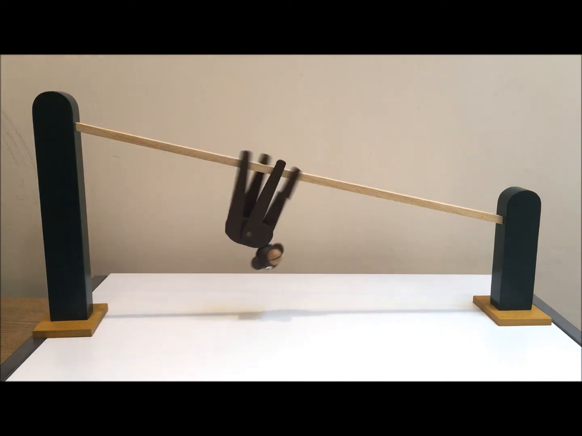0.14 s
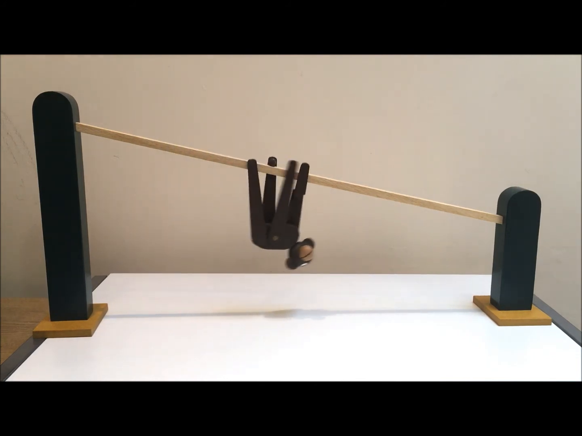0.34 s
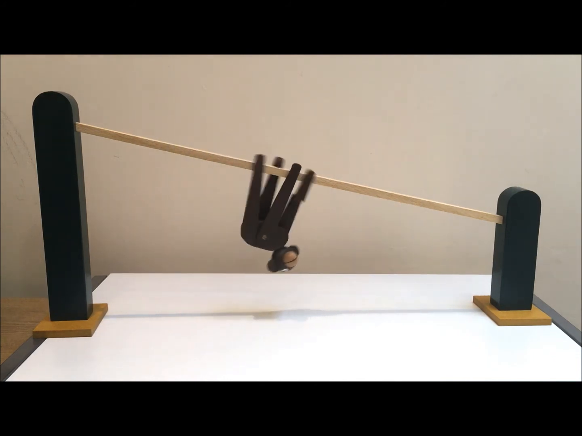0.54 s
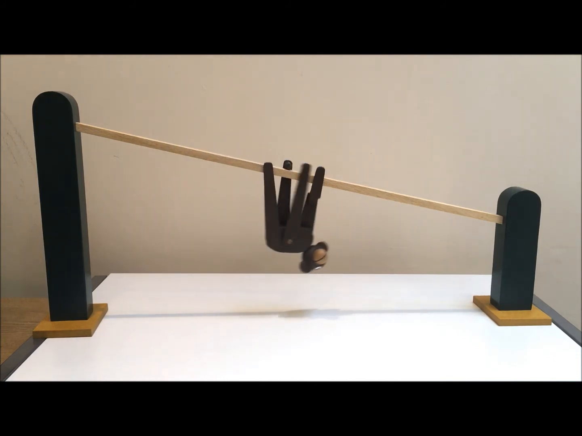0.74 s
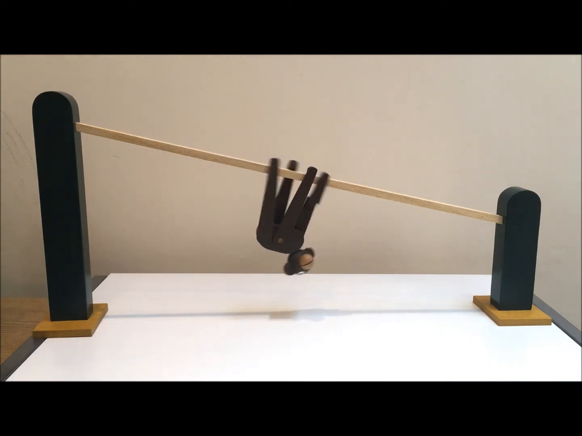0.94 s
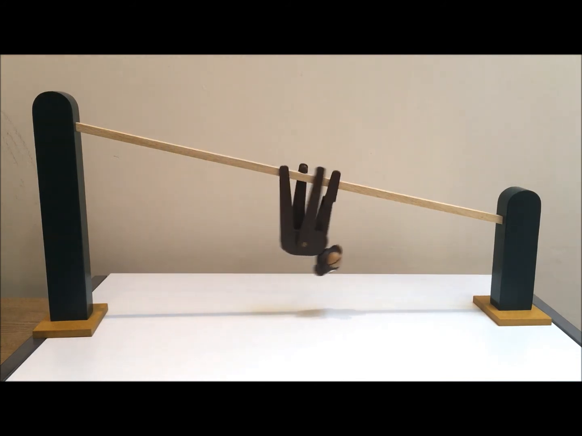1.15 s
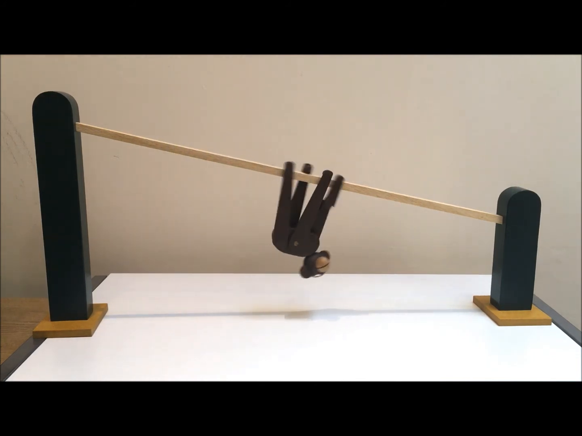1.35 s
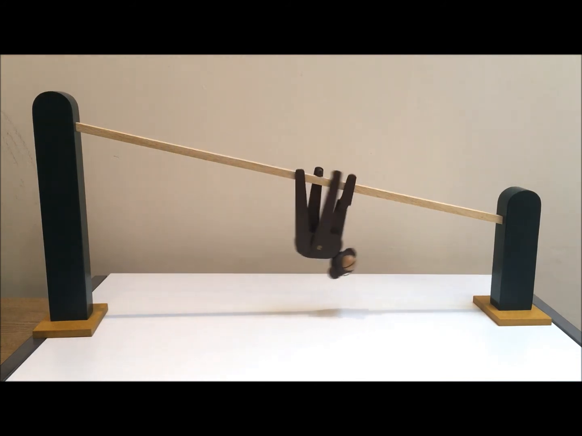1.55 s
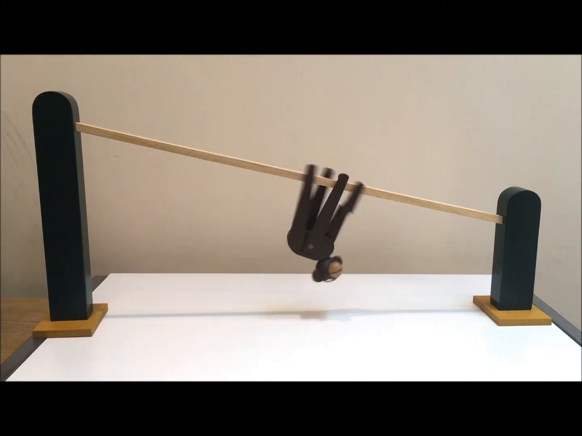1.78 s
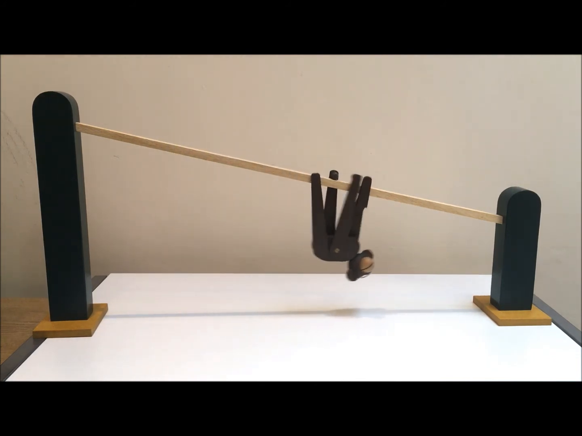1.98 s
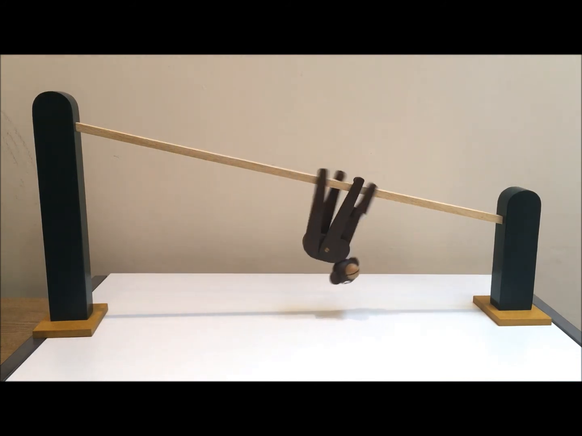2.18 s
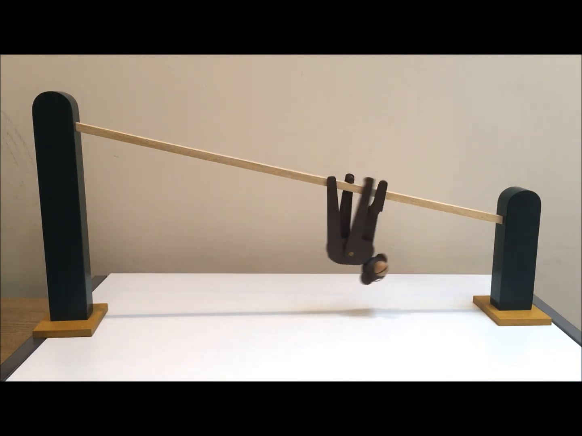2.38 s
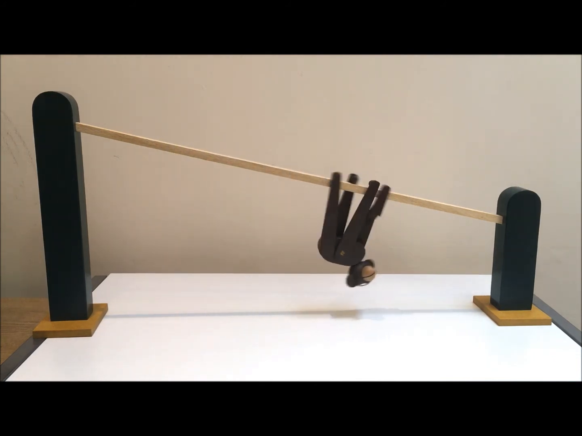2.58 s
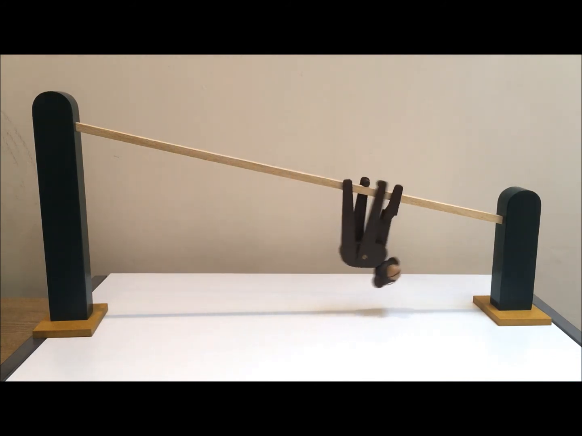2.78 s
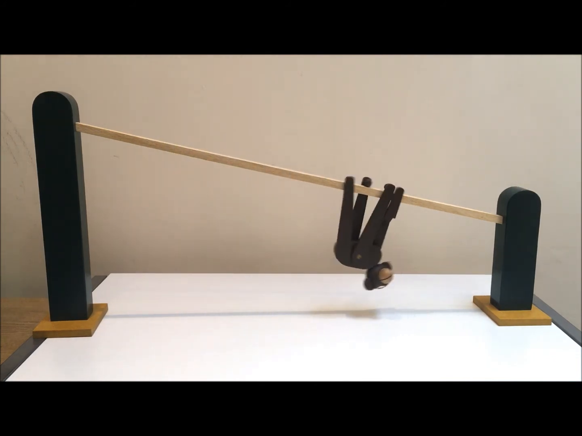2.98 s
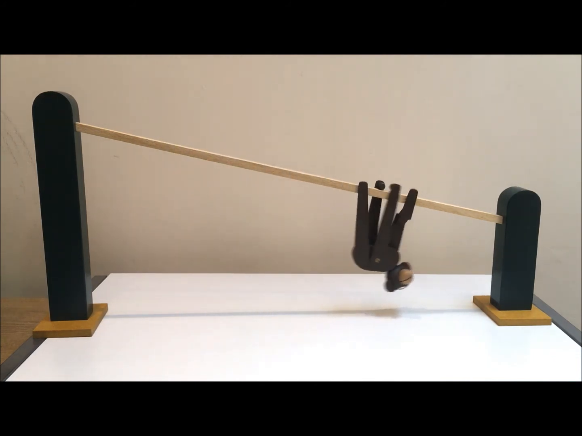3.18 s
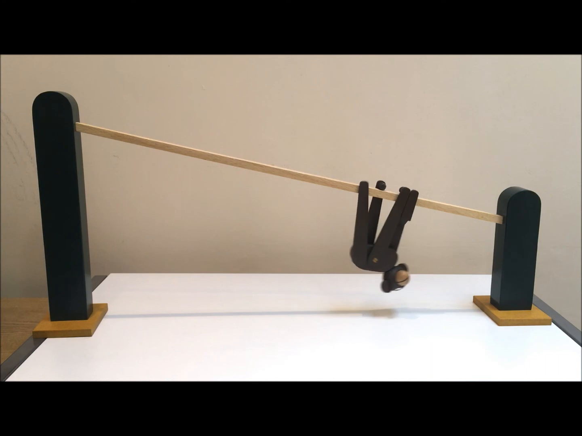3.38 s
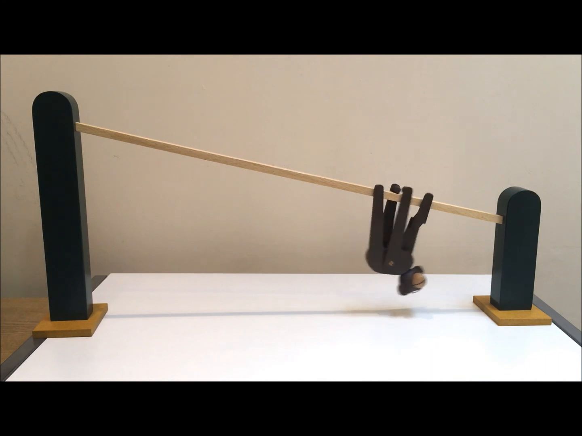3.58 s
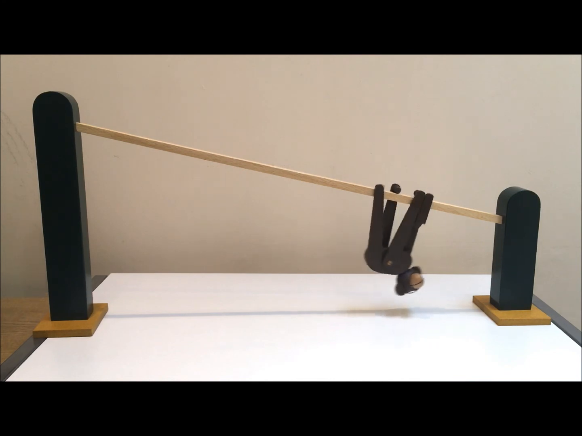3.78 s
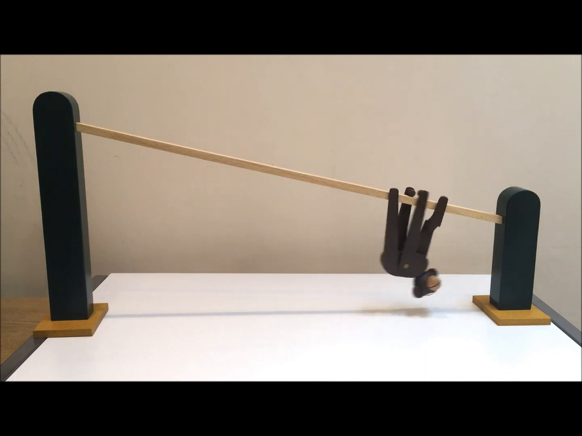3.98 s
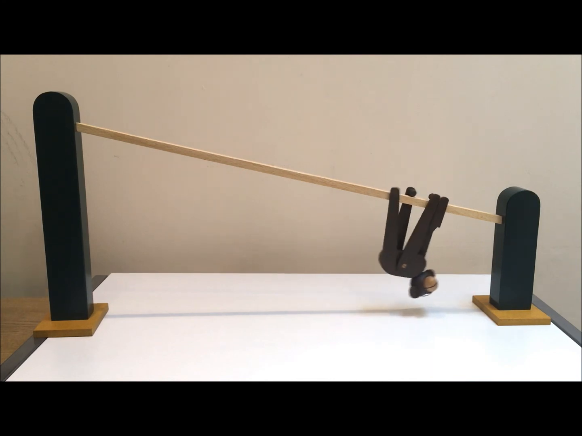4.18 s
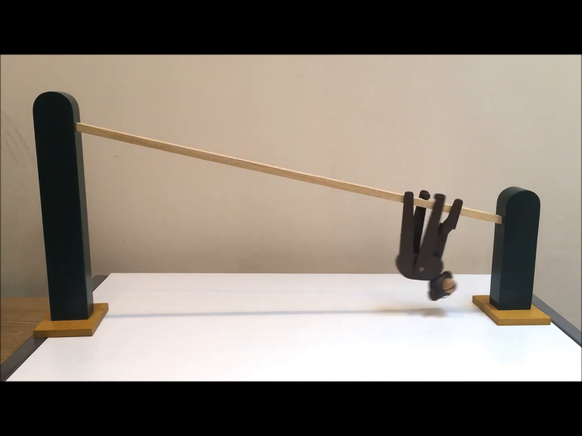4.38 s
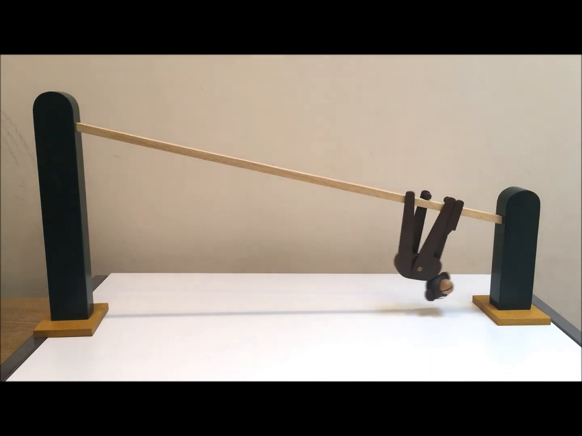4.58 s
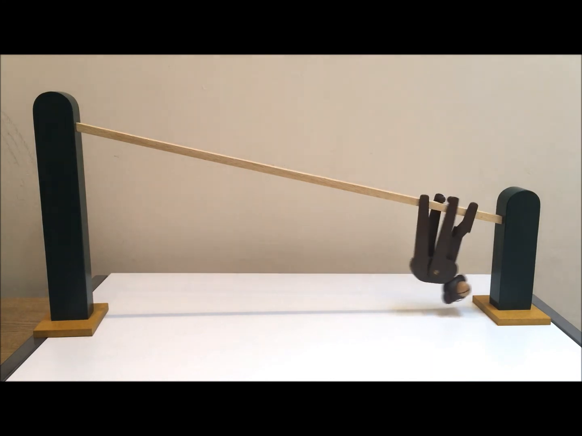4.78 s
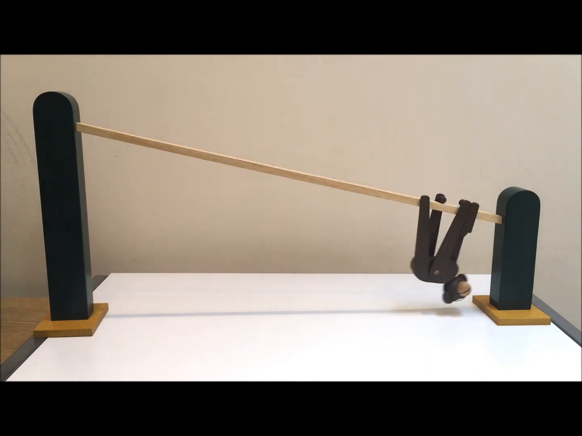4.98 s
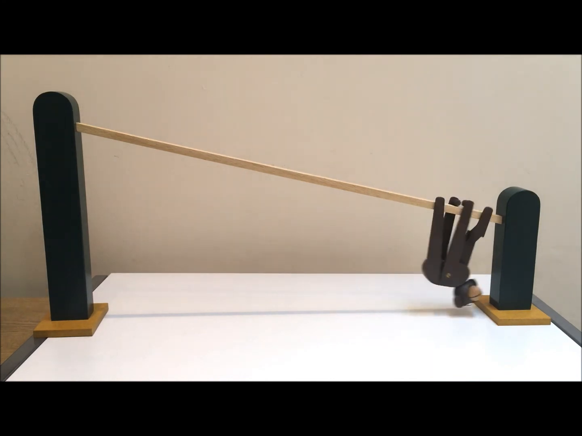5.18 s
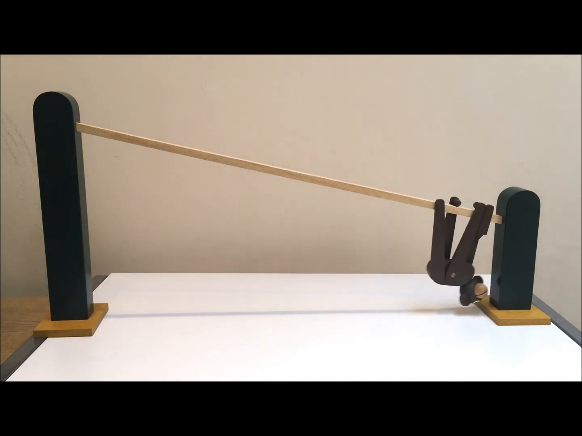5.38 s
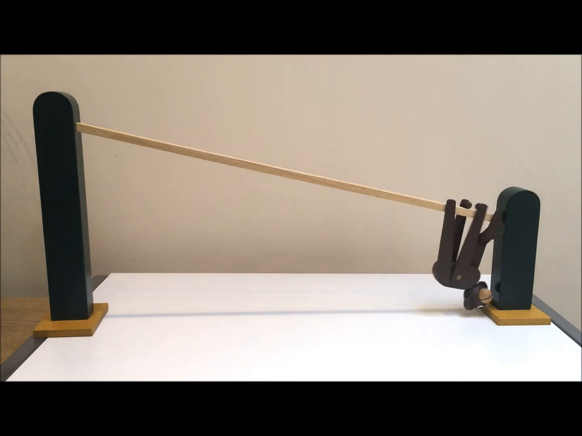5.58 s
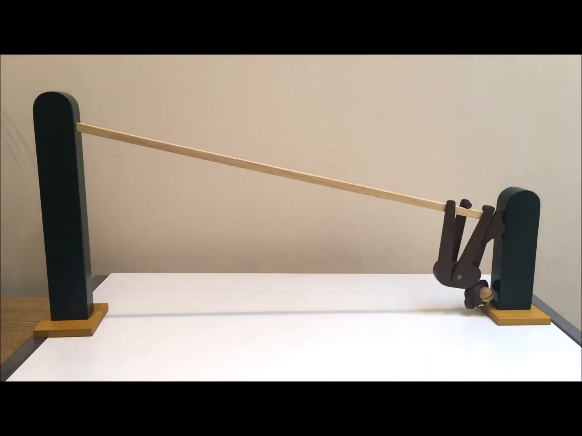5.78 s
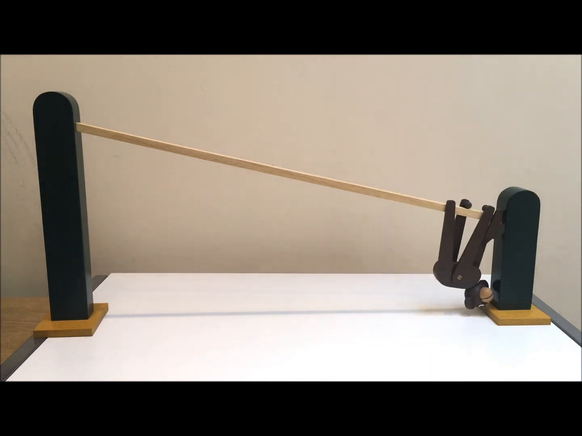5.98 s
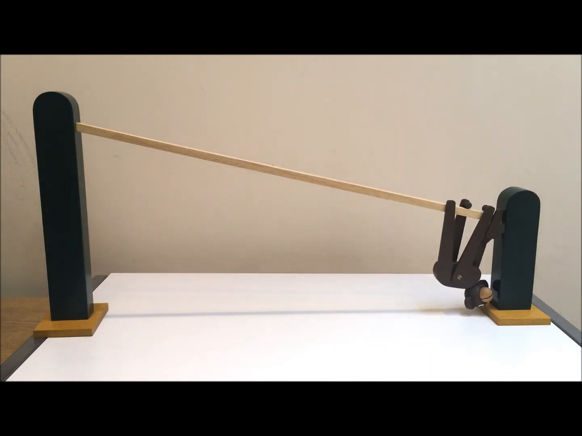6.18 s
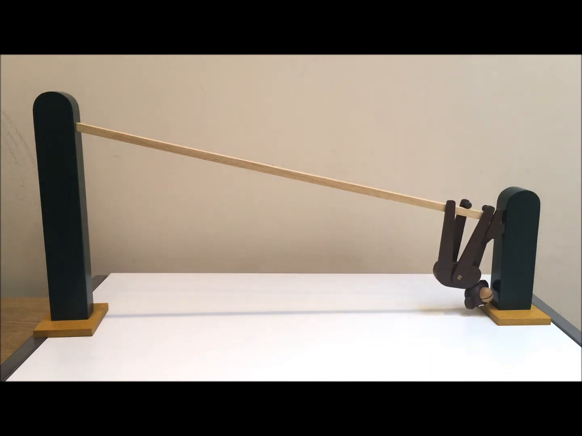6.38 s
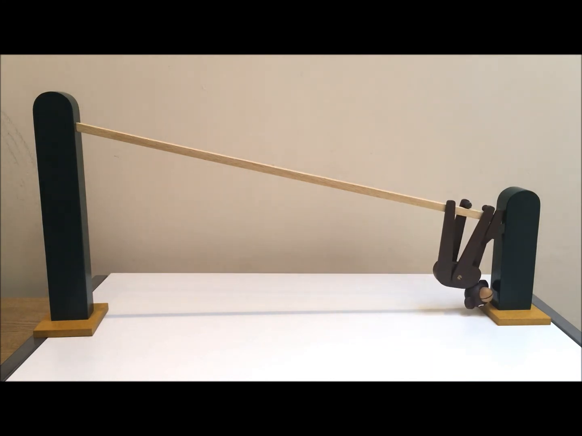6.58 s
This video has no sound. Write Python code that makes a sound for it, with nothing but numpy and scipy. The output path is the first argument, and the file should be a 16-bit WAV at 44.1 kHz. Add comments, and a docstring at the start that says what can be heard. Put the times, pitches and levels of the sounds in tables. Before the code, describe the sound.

Close by in a small, quiet room, a toy's wooden limbs click against a rod in a quick, steady tick-tock, gripping, briefly scraping and catching again. The clicks soften slightly while low thuds and a faint hum from the table grow. After about five and a half seconds the toy thumps into a wooden post, rattles lightly and settles, leaving faint room hiss.

```python
"""A toy figure rocks down a sloping wooden rod, clacking over a faint hum.
Each swing has a bright clack as its limbs grip, a short scraping, rattling slide, and a click as they
catch the rod again. The rod's stand, on a table in a small, dry room, thumps and hums more as the
figure nears the lower post. There the figure bumps and comes to rest."""
import sys
import numpy as np
from scipy import signal
from scipy.fft import rfft, irfft, next_fast_len
from scipy.io import wavfile

SR = 44100
rng = np.random.default_rng(int(sys.argv[2]) if len(sys.argv) > 2 else 0)


def master(y):
    """Save y as 16-bit WAV."""
    cut = np.clip(np.atleast_2d(y).T, -1, 1)
    pcm = np.round(cut * 32767)  # scale
    wavfile.write(sys.argv[1], SR, pcm.astype(np.int16))


N = 293265

# the limbs grip on the back swing: t/s, relative snap level/dB
GRIP_HITS = [(0.0005, -33), (0.4151, -21), (0.8247, -20.5), (1.2317, -19), (1.6276, -20), (2.0436, -19.5),
             (2.4571, -21.5), (2.8696, -22.5), (3.2849, -26), (3.7089, -23.5), (4.1005, -25), (4.492, -25),
             (4.9117, -26.5), (5.3094, -26.5)]
# the loose limbs bounce back: t/s, relative level/dB
LIMB_TICKS = [(0.051, -39.5), (1.5295, -53), (3.329, -47), (4.538, -40), (5.160, -40.5), (5.352, -51)]
# the limbs catch the rod after a slide: t/s, relative snap level/dB
CATCH_HITS = [(0.2248, -22), (0.6313, -23), (1.0373, -21), (1.4424, -20.5), (1.8551, -24), (2.2682, -22.5),
              (2.6788, -20), (3.0924, -26.5), (3.5064, -22.5), (3.9041, -20.5), (4.3023, -21.5),
              (4.7081, -21.5), (5.124, -28)]
# the body knocks against rod and post: t/s, relative level/dB
BODY_BUMPS = [(0.582, -50), (1.812, -51), (2.905, -45.5), (3.051, -45.5), (3.438, -52.5), (5.071, -49),
              (5.542, -39), (5.581, -42.5), (5.602, -58), (5.681, -54), (5.739, -59)]
# the limbs rub near the low end: t/s, length/s, level/dB
LIMB_RUBS = [(3.198,0.07,-63.5),(4.402,0.11,-64),(4.822,0.083,-65),(5.198,0.1,-65)]

# A mode is a pitch at which a thing rings; the wider it is, the sooner it fades.
# the wood in a grip, a catch and a body knock: f/Hz, width/Hz, relative level/dB, pitch rise/(share per s)
GRIP_WOOD_MODES = [(1913, 200, -4.5, 0.018), (3083, 70, -0.5, 0.008), (4050, 55, -7.5, 0.000036),
                   (4530, 280, -0.5, 0), (5000, 140, -19.5, 0), (6098, 190, 10, 0.0019),
                   (7280, 320, -1, 0.0028), (8700, 780, 10.5, 0.0015), (9436, 240, 10.5, 0.00088),
                   (10710, 450, 14, 0.000039), (12300, 540, 11, 0.00036), (13180, 450, 6.5, 0),
                   (14430, 780, 12.5, 0.0074), (15260, 530, 13, 0.00085)]
CATCH_WOOD_MODES = [(1812, 193, -4.5, 0.0099), (2335, 47, -3, 0.00058), (3223, 181, -17.5, 0.0025),
                    (3975, 470, -3.2, 0.0016), (4570, 550, 0.2, 0.001), (5480, 340, 3, 0.008),
                    (6180, 216, 5.5, 0.0035), (7100, 1200, 1.65, 0.02), (9000, 560, -0.3, 0.0028),
                    (11140, 490, 7.5, 0.00094), (11420, 860, 4, 0.024), (13250, 540, 13, 0.0087),
                    (15400, 610, -12.5, 0.0098)]
BODY_WOOD_MODES = [(1040,320,6,0.018),(1250,180,7.5,0.0065),(1560,540,4.5,0.0056),(1766,340,4.5,0.014),(2370,220,1.5,0.0025),(3050,230,2,0.012),(4400,980,-4.5,0.055)]
# the rod's longer rings: f/Hz, width/Hz, relative level/dB
ROD_RING_MODES = [(3280,45,-9.5),(6200,42,8.5),(10100,110,9)]
# six deep modes of the table, then the hollow ones of the posts: f/Hz, width/Hz, relative level/dB
TABLE_AND_POST_MODES = [(114.4,14,-6),(154.2,18.5,4.5),(182,16,1),(237,28,-3.5),(259.6,12,-2.5),(310.1,9.3,1.5),(509,20,-0.5),(564,9.4,2.5),(617,23,1.5),(681,8.6,7.5),(842,140,-6),(945,84.8,-3.5),(1067,37,0),(1257,30,0),(1520,170,-24)]
# the table trembles and the whole stand sways: f/Hz, width/Hz, relative level/dB
TABLE_HUM_MODES = [(112.8,8,5.5),(150.2,23.6,-4),(185.3,27,-3.5),(245,43,-19),(311.5,15,-13.5),(672,32,-19.5)]
STAND_SWAY_MODES = [(47,18,-4),(71,10.4,2.5),(95,15,-10.5)]
# the top edge of the table's thud, deeper near the lower post: t/s, f/Hz
THUD_CUTOFF = [(0,433),(2.2,515),(4.0,237),(4.8,182),(5.6,194)]

# the tone of the quiet room and of wood sliding on wood: f/Hz, relative level/dB
HISS_SPECTRUM = [(15,-43),(28,-27),(50,-5.5),(65,-12),(80,-14.5),(140,-25),(220,-20),(400,-26),(1480,-35),(3500,-36),(5000,-39),(12900,-34),(15600,-31),(16200,-52.5)]
SCRAPE_SPECTRUM = [(400,-8),(700,0.5),(1250,-4.5),(1800,-12.5),(2500,-13),(3200,-17.5),(3800,-22),(5800,-17.5),(9000,-21.5),(12000,-19),(16000,-38)]
# how fast the room's echo fades: f/Hz, time to fall 60 dB/s
ECHO_FADE = [(150,2.5),(700,0.18),(2500,0.1852),(6000,0.1461),(14000,0.143)]
# the room's echo against the direct sound: f/Hz, level/dB
ECHO_LEVEL = [(150,28),(700,-4),(2500,-1.5),(6000,-7),(10000,-4),(15000,-14)]
# single echoes from the walls: delay/s, level/dB
WALL_ECHOES = [(0.015,-23),(0.0164,-17.5),(0.035,-26),(.0462,-34)]

SLIDE_S, POST_HIT_S = .0685, 5.5397   # length of each slide; when the figure meets the post
SLIDE_ENDS = [s for s, _ in CATCH_HITS] + [POST_HIT_S]
TABLE_MODES, POST_MODES = TABLE_AND_POST_MODES[:6], TABLE_AND_POST_MODES[6:]
TAIL = np.arange(SR // 4) / SR   # time within one short sound, in seconds


def from_db(db):
    """Turn decibels into a gain."""
    return 10 ** (np.asarray(db) / 20)


def rms_one(x):
    """Scale to an average (rms) level of 1."""
    return x / np.sqrt(np.mean(x ** 2) + 1e-20)


def unit_hit(x):
    """Scale a hit to the energy of 4 ms at rms 1."""
    return x / np.sqrt(np.sum(x ** 2) / (.004 * SR) + 1e-20)


def at_hz(points, hz):
    """Read between a table's rows on a log-frequency axis."""
    points = np.array(points)
    return np.interp(np.log(np.maximum(hz, 1)), np.log(points[:, 0]), points[:, 1])


def coloured(x, spectrum):
    """Give a noise the tone of a spectrum, at rms 1."""
    size = next_fast_len(len(x) + len(TAIL))
    gains = from_db(at_hz(spectrum, np.fft.rfftfreq(size, 1 / SR)))
    return rms_one(irfft(rfft(x, size) * gains, size)[:len(x)])


def keep_band(x, hz, kind):
    """Let the "low" side, the "high" side or a "band" through."""
    return signal.sosfilt(signal.butter(2, hz, kind, fs=SR, output="sos"), x)


def add(out, s, x):
    """Mix x into out at time s."""
    i = max(round(s * SR), 0)
    out[i:i + len(x)] += x[:N - i]


def resonance(x, hz, width):
    """Let x ring at one pitch, with gain 1 at the peak."""
    r = np.exp(-np.pi * width / SR)
    feedback = [1, -2 * r * np.cos(2 * np.pi * hz / SR), r * r]
    return signal.lfilter(np.array([1, 0, -1]) * (1 - r * r) / 2, feedback, x + 1e-18)


def ringing(modes, force, spread_db, detune, s=0):
    """Each mode takes its share of a blow, a little differently every time."""
    out = 0
    for k, (hz, width, db, *rise) in enumerate(modes):
        pitch = hz * (1 + sum(rise) * s + detune * rng.standard_normal())
        gain = np.sqrt(width) * from_db(db + spread_db * rng.standard_normal())
        out = out + (-1) ** k * gain * unit_hit(resonance(force, pitch, width))
    return out


def strike(modes, s, chatter, chatter_s, crack_db=-8.0, crack_hz=2200):
    """A hard contact and its tiny bounces (chatter) give a crack and ring the wood."""
    force = rng.standard_normal(len(TAIL)) * np.exp(-TAIL / chatter_s)
    force *= chatter / np.linalg.norm(force)
    force[0] += 1   # the first contact
    ring = unit_hit(ringing(modes, force, spread_db=1.0, detune=0.00071, s=s))
    return ring + from_db(crack_db) * unit_hit(keep_band(force, crack_hz, "high"))


def shake(modes, build_s, fade_s):
    """A blow runs down the posts and shakes stand and table, which take a moment to swell."""
    force = rng.standard_normal(len(TAIL)) * (1 - np.exp(-TAIL / build_s)) ** 2 * np.exp(-TAIL / fade_s)
    return unit_hit(ringing(modes, force, spread_db=4.0, detune=0.00111))


def deepen(x, s):
    """Dull the table's thud to suit the place the figure has reached at time s."""
    return keep_band(x, np.interp(s, *np.transpose(THUD_CUTOFF)), "low")


def room(x, wall_s=0.011, early_db=-1.5, build_s=0.0025):
    """Sound scatters off the table, then the walls answer, in a new pattern each time."""
    edges = np.geomspace(70, 18000, 12)   # band edges in Hz
    white, echoes = rng.standard_normal((2, len(TAIL))), np.zeros(len(TAIL))
    walls = .5 + .5 * np.tanh((TAIL - wall_s) * 1000)   # a smooth step from 0 to 1
    arrival = (1 - np.exp(-TAIL / build_s)) * (walls + (1 - walls) * from_db(early_db))
    for k, (low, high) in enumerate(zip(edges, edges[1:])):
        hz = np.sqrt(low * high)
        fade = np.exp(-np.log(1000) * TAIL / at_hz(ECHO_FADE, hz))
        tail = keep_band(white[k % 2], (low, high), "band") * arrival * fade
        gain = np.sqrt(2 * (high - low) / SR) * from_db(at_hz(ECHO_LEVEL, hz))
        echoes += gain * tail / np.linalg.norm(tail)
    for delay, db in WALL_ECHOES:
        echoes[round((delay + .0004 * rng.standard_normal()) * SR)] += from_db(db)
    return x + signal.fftconvolve(x, echoes)[:len(x)]


def on_descent(s, top_db, bottom_db, power=1):
    """Move a level from the top of the rod to the lower post; a high power makes the change late."""
    return top_db + (bottom_db - top_db) * np.clip(s / POST_HIT_S, 1e-9, 1) ** power


def clack(blow, s, snap_db, wood_db, rod_db, knock_db, knock_fade_s, thump_db,
          swell_s=0.018, split_hz=7500):
    """One hit: woody click, bright snap, faint ring of the rod, knock of the posts, table thump."""
    ring = room(keep_band(blow, 1350, "high"))   # thin limbs give off no bass
    wood = keep_band(keep_band(ring, split_hz, "low"), split_hz, "low")
    snap = keep_band(keep_band(ring, split_hz, "high"), split_hz, "high")
    rod = ringing(ROD_RING_MODES, signal.unit_impulse(len(TAIL)), spread_db=2.5, detune=.001)
    knock = shake(POST_MODES, build_s=0.0016, fade_s=knock_fade_s)
    thump = deepen(shake(TABLE_MODES, build_s=swell_s, fade_s=0.014), s)
    parts = (wood_db, wood), (snap_db, snap), (rod_db, rod), (knock_db, knock), (thump_db, thump)
    return sum(from_db(db) * unit_hit(part) for db, part in parts)


def grips(trim_db=-1.0):
    """The limbs clack as they grip on each back swing; lower down, knock gives way to thump."""
    out = np.zeros(N)
    for s, snap_db in GRIP_HITS:
        blow = strike(GRIP_WOOD_MODES, s, chatter=1.0, chatter_s=0.0025)
        hit = clack(blow, s, snap_db + trim_db, wood_db=on_descent(s, -29.5, -31), rod_db=-43.5,
                    knock_db=on_descent(s, -45, -51.5, power=4.1), knock_fade_s=0.032,
                    thump_db=on_descent(s, -46, -40.5))
        add(out, s, hit)
    return out


def stand_hum(modes, top_db, bottom_db, power, swing_db, rest_db,
              lag_s=0.063, settle_s=0.067, settle_db_per_s=125):
    """The swinging weight shakes the stand: more after each catch and near the post, little at rest."""
    t = np.arange(N) / SR
    swings_done = np.interp(t - lag_s, SLIDE_ENDS, np.arange(len(SLIDE_ENDS)))
    swing = np.cos(2 * np.pi * swings_done)
    settling_db = settle_db_per_s * np.maximum(t - POST_HIT_S - settle_s, 0)
    level_db = on_descent(t, top_db, bottom_db + swing_db * swing, power) - settling_db
    jiggle, tremble = rng.standard_normal(N), np.zeros(N)
    for hz, width, db in modes:
        ring = resonance(resonance(jiggle, hz, width), hz, width)
        tremble += np.sqrt(width) * from_db(db) * rms_one(ring)
    return from_db(np.maximum(level_db, rest_db)) * rms_one(tremble)


def room_hiss(level_db=-67.5):
    """The quiet room has a steady, faint rumble and hiss."""
    return from_db(level_db) * coloured(rng.standard_normal(N), HISS_SPECTRUM)


def taps(rows, modes, trim_db, chatter, chatter_s, soft_hz):
    """Light contacts of limbs or body ring the wood with less treble."""
    out = np.zeros(N)
    for s, db in rows:
        ring = keep_band(strike(modes, s, chatter, chatter_s), soft_hz, "low")
        add(out, s, from_db(db + trim_db) * room(unit_hit(ring)))
    return out


def slides(scrape_db=-59.5, posts_db=-62, slips_per_s=110, slip_s=0.0017, rub=0.57, fade_s=0.18):
    """The limbs let go and scrape down the rod in uneven slips; posts and table ring along."""
    out = np.zeros(N)
    length_gain = np.sqrt(SLIDE_S / TAIL[-1])   # makes the levels hold for the slide's own length
    for end in SLIDE_ENDS:
        s = end - SLIDE_S
        strengths = np.minimum(rng.exponential(0.39, len(TAIL)), 1.6)
        slips = strengths * (rng.random(len(TAIL)) < slips_per_s / SR)
        slips[0] = 1.33   # the first slip is a firm one
        pressure = rub + signal.lfilter([1], [1, -np.exp(-1 / (slip_s * SR))], slips)
        friction = pressure * rng.standard_normal(len(TAIL)) * np.exp(-TAIL / fade_s) * (TAIL < SLIDE_S)
        scrape = room(keep_band(coloured(friction, SCRAPE_SPECTRUM), 730, "high"))
        posts = ringing(POST_MODES, friction, spread_db=5.0, detune=0.002)
        table = ringing(TABLE_MODES, friction, spread_db=4.0, detune=.003)
        thud = deepen(keep_band(table, 305, "high"), s)
        thud_db = on_descent(s, -57.5, -57, power=5.2)
        for db, part in (scrape_db, scrape), (posts_db, posts), (thud_db, thud):
            add(out, s, from_db(db) * length_gain * rms_one(part))
    return out


def rattles(level_db=-59.5, spread_db=7):
    """The loose limbs tap as each slide starts and once partway: rows of t/s, relative level/dB."""
    return [(end - SLIDE_S * (1 - share), level_db + spread_db * rng.standard_normal())
            for end in SLIDE_ENDS for share in (0, rng.uniform(.2, .6))]


def catches(trim_db=-1.0):
    """The limbs stop a slide with a short, tight click; the table thumps more lower down."""
    out = np.zeros(N)
    for s, snap_db in CATCH_HITS:
        blow = strike(CATCH_WOOD_MODES, s, chatter=0.79, chatter_s=0.0019)
        hit = clack(blow, s, snap_db + trim_db, wood_db=on_descent(s, -32.5, -30), rod_db=-60,
                    knock_db=on_descent(s, -45.5, -44.5), knock_fade_s=0.014,
                    thump_db=on_descent(s, -42.5, -30.5, power=8.1))
        add(out, s, hit)
    return out


def rubs(swell=0.62):
    """Near the low end, wood drags over wood, harder as the back swing goes on."""
    out = np.zeros(N)
    for s, length, db in LIMB_RUBS:
        drag = rng.standard_normal(len(TAIL)) * (TAIL / length) ** swell * (TAIL < length)
        scrape = room(keep_band(coloured(drag, SCRAPE_SPECTRUM), 420, "high"))
        add(out, s, from_db(db) * np.sqrt(length / TAIL[-1]) * rms_one(scrape))
    return out


def post_hit():
    """The figure runs into the post: little snap and a heavy thump."""
    out = np.zeros(N)
    blow = strike(CATCH_WOOD_MODES, POST_HIT_S, chatter=1.0, chatter_s=0.0028)
    hit = clack(blow, POST_HIT_S, snap_db=-35, wood_db=-37, rod_db=-54,
                knock_db=-51, knock_fade_s=0.0064, thump_db=-28, swell_s=0.0048)
    add(out, POST_HIT_S, hit)
    return out


def scene():
    """The toy over the faint hiss of the room, in mono."""
    ticks = taps(LIMB_TICKS, GRIP_WOOD_MODES, trim_db=-1.0, chatter=0.45, chatter_s=0.001, soft_hz=6740)
    bumps = taps(BODY_BUMPS + rattles(), BODY_WOOD_MODES,
                 trim_db=-0.5, chatter=1.0, chatter_s=0.0034, soft_hz=4530)
    hum = stand_hum(TABLE_HUM_MODES, top_db=-66, bottom_db=-52.5, power=2.76, swing_db=6.5, rest_db=-78)
    sway = stand_hum(STAND_SWAY_MODES,
                     top_db=-72, bottom_db=-64.5, power=0.82, swing_db=3.5, rest_db=-78.5)
    hiss = room_hiss()
    return (grips() + catches() + post_hit() + ticks + bumps + slides() + rubs() + hum + sway + hiss)[None]


def record(dry, cutoff_hz=16100):
    """Cut the very highest treble steeply."""
    return signal.sosfilt(signal.ellip(10, .2, 80, cutoff_hz, fs=SR, output="sos"), dry)


dry = scene()
out = record(dry)
master(out)
```